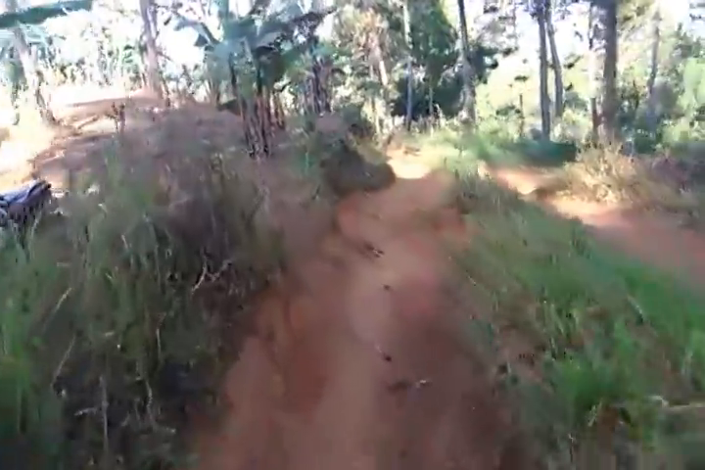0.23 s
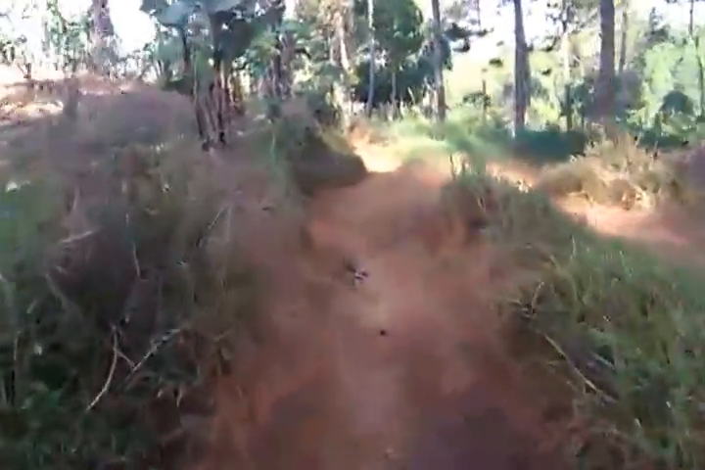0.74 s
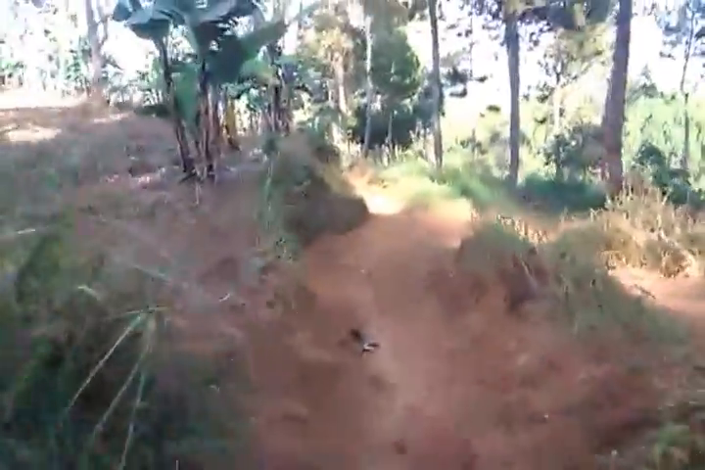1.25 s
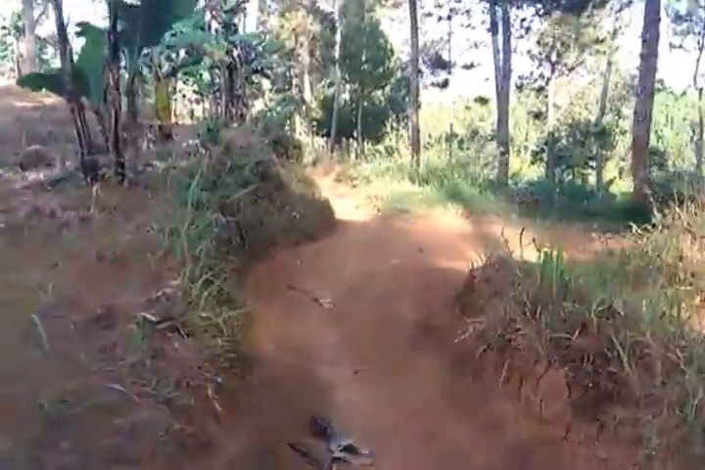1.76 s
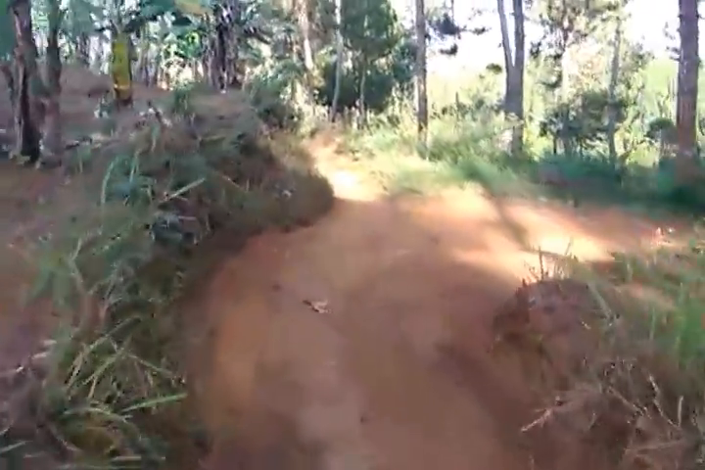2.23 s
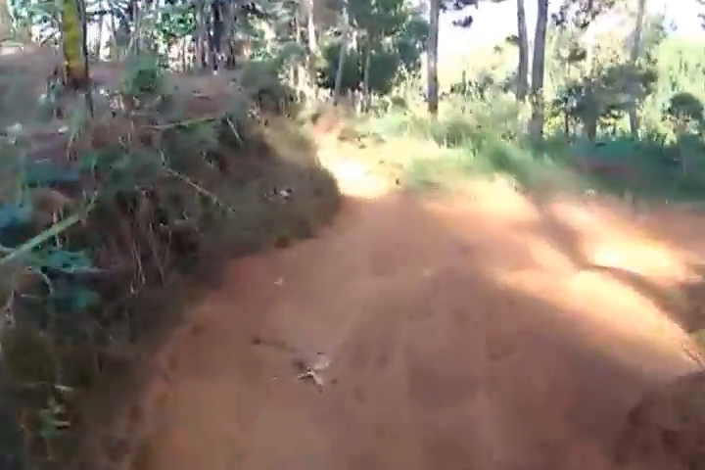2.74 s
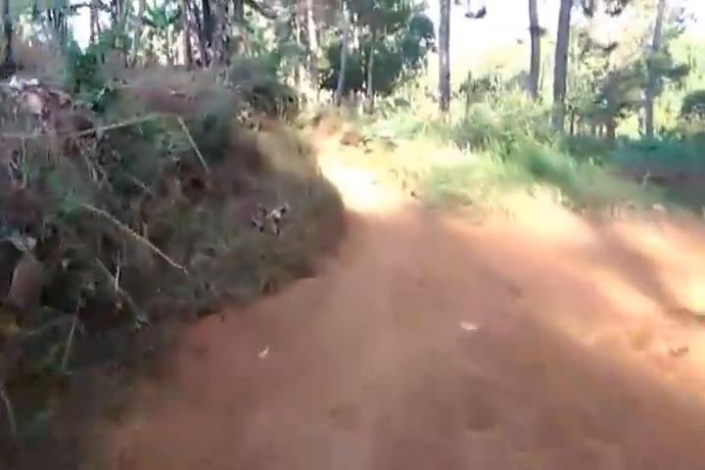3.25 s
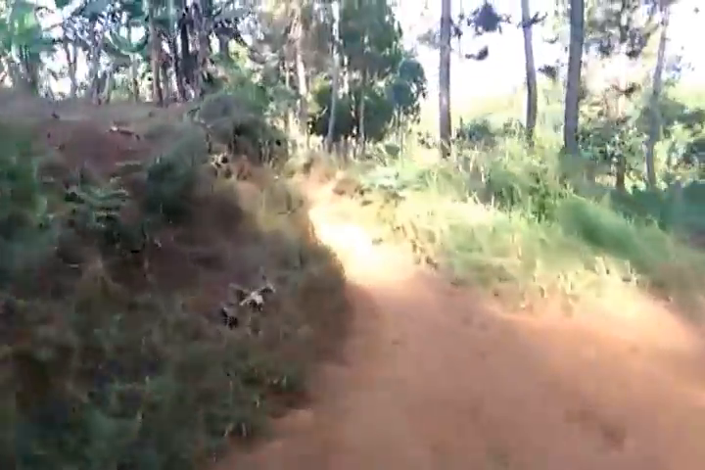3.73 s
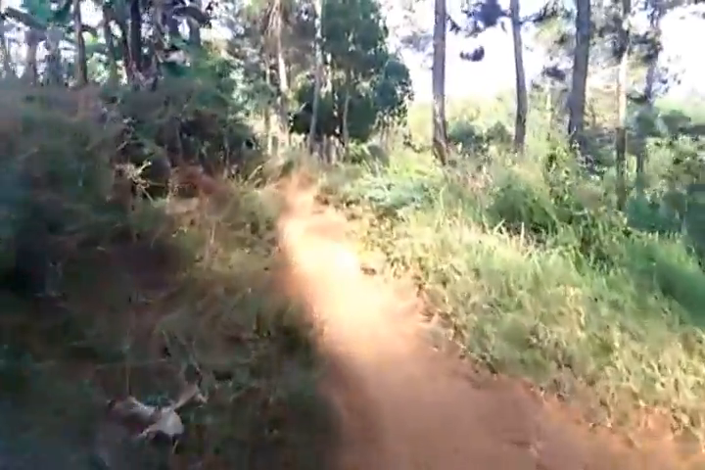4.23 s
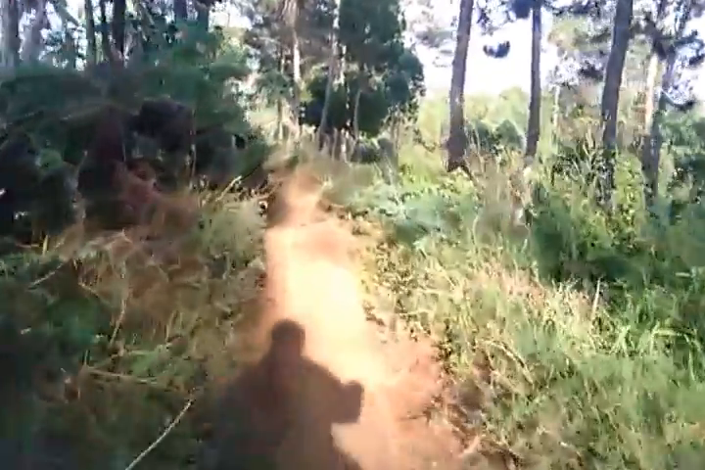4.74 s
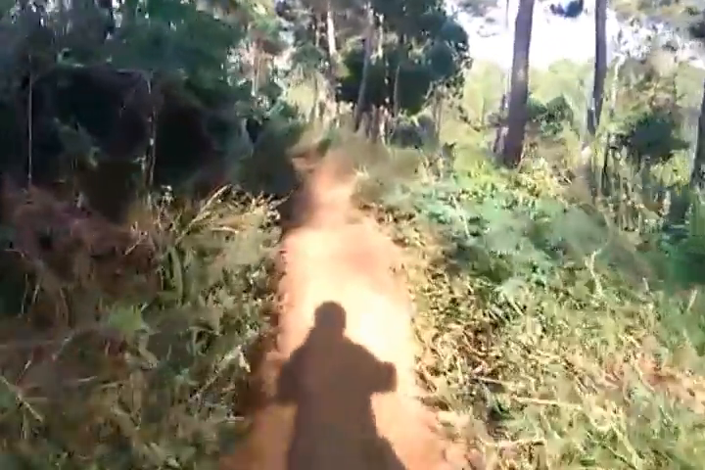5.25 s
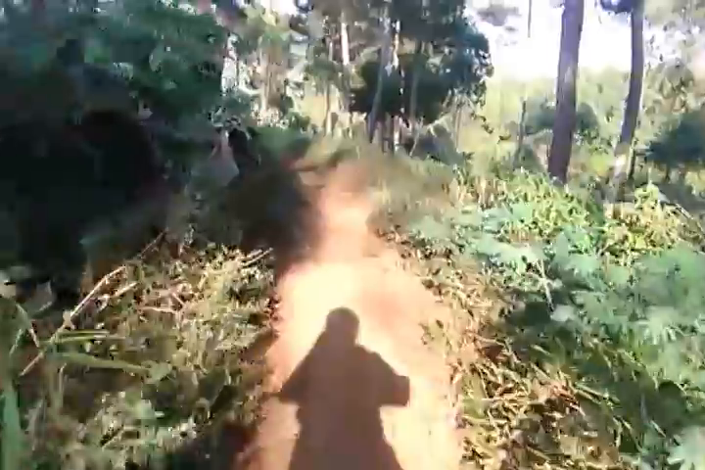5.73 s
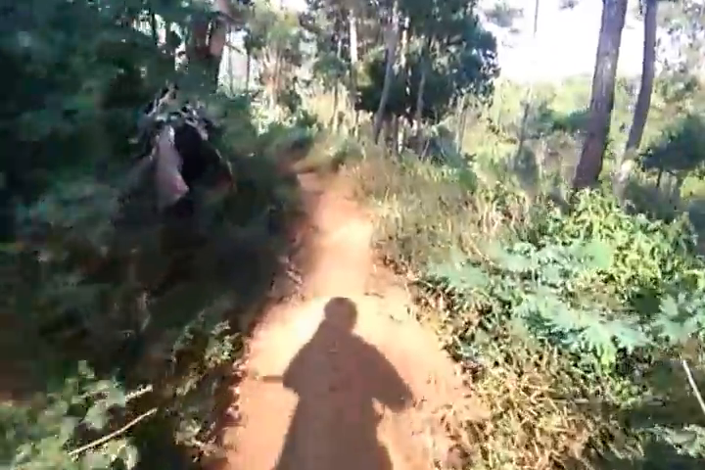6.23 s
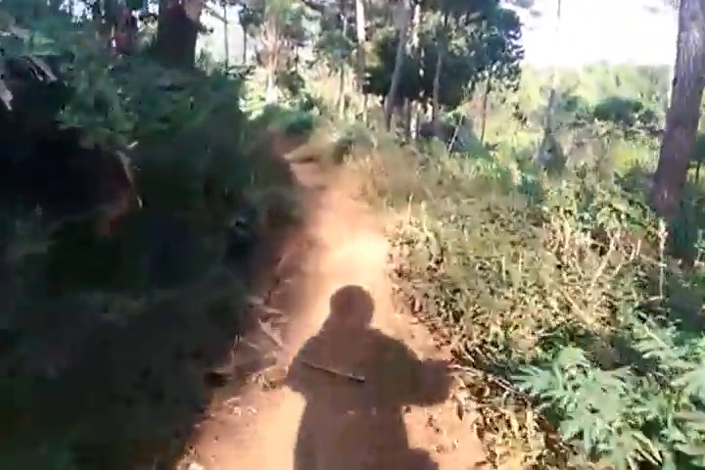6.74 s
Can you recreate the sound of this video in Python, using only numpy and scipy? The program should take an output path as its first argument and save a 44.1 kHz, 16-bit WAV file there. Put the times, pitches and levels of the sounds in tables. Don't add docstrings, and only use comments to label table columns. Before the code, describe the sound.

A four-stroke dirt bike putters slowly along a rough dirt path outdoors, heard very close through a dull on-body microphone with little top end. Uneven exhaust pulses dominate, about twelve a second, with ticking, rattling metal and low mount rumble. Jolts knock the microphone, small stones tick, a brief rev rises midway and falls with a hiccup, then steady lighter idling continues to the end.

```python
import sys
import numpy as np
from scipy import signal
from scipy.fft import rfft, irfft
from scipy.io import wavfile
from scipy.ndimage import uniform_filter1d

SR = 44100
rng = np.random.default_rng(int(sys.argv[2]) if len(sys.argv) > 2 else 0)


def invert_db(level):
    return 10 ** (np.asarray(level, dtype=float) / 20)


def dump_mix(stems):
    frames = np.atleast_2d(stems).T
    limited = np.clip(frames, -1, 1)
    pcm = np.round(limited * 32767).astype(np.int16)
    wavfile.write(sys.argv[1], SR, pcm)


N = 307799
IDLE_PER_S = 12

# time in seconds, firings per second.
ENGINE_SPEED = [(0.0, 12.576), (0.41, 12.752), (0.45, 12.487), (1.41, 11.339), (1.88, 11.769),
                (2.4, 13.051), (2.58, 14.374), (2.69, 14.059), (3.33, 16.961), (3.96, 11.506),
                (4.48, 11.687), (4.82, 12.474), (4.98, 11.988), (5.46, 12.776), (5.7, 12.053),
                (6.44, 11.815), (6.45, 12.03), (6.98, 11.436)]

# time in seconds, boom at the camera in dB, bark trim in dB,
# outlet jet in dB, extra puff length in ms.
THROTTLE_LEAN = [(0, 10.5, -3, 0.5, .2), (.25, 10.5, -0.4, -0.5, 0.66), (.64, 14, -2, -.6, -0.051),
                 (.8, 12.5, -.6, -3, -.1), (1.2, 14, 2.5, -1, 0.11), (1.55, 12.7, 3.5, -2, -0.12),
                 (2.0, 15, 3.5, -3, -.25), (2.4, 12.5, 0.9, 0.7, .6), (2.75, 14.5, 2, -2, 0.083),
                 (3.03, 19.5, 1.1, 1.5, -0.14), (3.4, 16.5, -1, -1.5, 0.099), (3.9, 13.5, 4, -4, 0.38),
                 (4.3, 9, 2, -0.3, 0.082), (4.95, 4, -0.5, 0.3, 0.21), (5.55, 9.5, 0, 0.8, 0.044),
                 (6.1, 7.5, 1.1, 0, 0.48), (6.45, 9, -0.5, 1, .12), (6.9, 11.5, 1.6, -1, -0.12)]

# place after the puff as a share of the cycle, width as a share of
# the cycle, frequency struck most in Hz, reach in octaves, level in dB.
VALVE_KNOCKS = [
    (.21, 0.068, 1950, .35, 4.5),
    (.36, 0.066, 850, 0.29, 6.5),
    (.42, 0.057, 1300, .2, -2),
    (.53, 0.028, 780, 0.4, 5),
    (.8, 0.064, 1220, 0.18, 3.5),
    (0.896, 0.06, 3360, 1, 3.5),
    (.34, 0.035, 4000, 0.38, 7.5),
    (0.27, 0.13, 140, 1, 2.5),
]


def ring(x, hz, width_hz, order=1):
    b, a = signal.iirpeak(hz, hz / width_hz, SR)
    for _ in range(order):
        x = signal.lfilter(b, a, x)
    return x


def unit(x):
    return x / np.sqrt(np.mean(x ** 2))


def add(out, x, s):
    start = int(round(s * SR))
    a, b = max(start, 0), min(start + len(x), N)
    out[a:b] += x[a - start:b - start]


def colour(x, points):
    hz, db = np.transpose(points)
    f = np.arange(1, N // 2 + 2) * SR / N
    gain_db = np.interp(np.log(f), np.log(hz), db, -90, -90)
    return irfft(rfft(x) * invert_db(gain_db), N)


def walk(rate):
    hold = int(SR / rate)
    steps = np.repeat(rng.standard_normal(N // hold + 1), hold)
    return uniform_filter1d(steps, hold)[:N]


def grains(per_s, spread_db):
    hit = rng.random(N) < per_s / SR
    size = invert_db(spread_db * rng.standard_normal(N))
    return unit(hit * size * rng.choice([-1, 1], size=N))


def curve(table, s):
    knots, *columns = np.transpose(table)
    return [np.interp(s, knots, c) for c in columns]


def struck(hz, gear):
    _, _, centre, reach, db = np.transpose(VALVE_KNOCKS)
    octaves = np.log2(hz / centre)
    return invert_db((db * np.exp(-(octaves / reach) ** 2)) @ gear)


def rumble():
    # frequency in Hz, level per Hz in dB.
    mount_spectrum = [(20, -3), (60, 0), (100, -0.5), (150, -7), (210, -11), (340, -6), (420, -16.5),
                      (520, -19.5), (750, -29), (1000, -41)]
    shake = rng.standard_normal(N) * invert_db(3.0 * walk(9)) + 0.49 * grains(60, 1.5)
    return unit(colour(shake, mount_spectrum))


def grit(gear, shake):
    # frequency in Hz, level per Hz in dB.
    grit_spectrum = [(1940, -25.5), (3300, -10), (3670, -5.5), (4100, -9), (4290, -1), (6040, 1),
                     (6640, -5), (7220, -10), (7640, -20), (9930, -50.5), (16800, -120)]
    hiss = rng.standard_normal(N) * invert_db(1.6 * walk(25)) + 0.31 * grains(680, 2.0)
    return unit(colour(hiss * shake * struck(3100, gear), grit_spectrum))


def chatter():
    # start in seconds, length in seconds, peak in dB, frequency in Hz.
    ruts = [
        (0.221, .03, -13.5, 190),
        (.655, .062, -12.5, 228),
        (3.715, .05, -18, 210),
        (3.8086, .058, -11.5, 238),
    ]
    beat_s = .0078
    rows = []
    for (s, length, db, hz), chance in zip(ruts, rng.standard_normal((len(ruts), 12, 3))):
        for k, (late, size, pitch) in enumerate(chance):
            if k * beat_s < length:
                when = s + beat_s * (k + 0.14 * late)
                rows.append((when, db + 1.4 * size, hz * 1.35 ** pitch, (-1) ** (k // 2)))
    return rows


def bumps():
    # time in seconds, peak in dB, frequency in Hz, direction as +1 or -1.
    jolts = [(0.1545, -9, 360, -1), (0.261, -8, 215, -1), (0.4322, -14, 163, -1), (0.628, -13, 204, -1),
             (0.6794, -5.5, 187, 1), (0.871, -19, 185, -1), (1.4347, -15.5, 198, -1), (1.5143, -12, 262, 1),
             (1.5203, -15, 232, 1), (2.636, -16, 150, 1), (2.6472, -13, 167, -1), (3.012, -13, 219, -1),
             (3.47, -20, 198, 1), (3.6533, -10, 215, 1), (3.6736, -11.5, 315, -1), (3.8257, -7.5, 347, -1),
             (3.9704, -20, 261, 1), (3.991, -17, 241, -1), (4.1612, -16, 219, -1), (4.5025, -16.5, 347, -1),
             (4.5857, -20, 193, -1), (4.6573, -17, 180, -1), (4.6861, -14, 204, -1), (4.707, -16, 166, 1),
             (4.934, -15.5, 159, -1), (5.3237, -21, 230, 1), (5.5376, -9, 206, 1), (5.9125, -10.5, 211, -1),
             (6.1118, -17, 206, -1), (6.2566, -14.5, 267, -1)]
    out = np.zeros(N)
    t = np.arange(-600, 600) / SR
    for s, db, hz, way in jolts + chatter():
        swing = np.exp(-(t * hz / 0.62) ** 2) * np.cos(2 * np.pi * hz * t)
        swing = swing + 0.1 * np.exp(-(t / 0.00063) ** 2)
        add(out, np.sign(way) * invert_db(db) * swing, s + t[0])
    return out


def ticks():
    # time in seconds, peak in dB, frequency in Hz.
    stones = [(.9562, -27.5, 4500), (1.3868, -29, 3500), (1.8757, -23.5, 5400), (1.916, -23.5, 4560),
              (2.0174, -19.5, 4410), (2.0713, -23.5, 4000), (2.3895, -29.5, 4050), (2.5445, -22, 6570),
              (2.578, -26.5, 5630), (2.82, -25, 4510), (3.025, -21, 5100), (4.0254, -22, 3000),
              (4.6892, -22, 2500), (5.6134, -29, 4060), (6.0256, -30, 3920), (6.2584, -26.5, 4500),
              (6.573, -24.5, 6300), (6.574, -25.5, 3950), (6.588, -21.5, 1600)]
    # time in seconds, peak in dB, frequency in Hz, decay in ms.
    slaps = [(1.514, -21.5, 550, 5), (2.5446, -24, 5200, 4.5), (2.556, -21.5, 1890, 8),
             (2.5565, -26.5, 3030, 6), (2.559, -20, 636, 17), (2.703, -25.5, 684, 11),
             (3.826, -21, 700, 12), (3.828, -27, 1940, 19), (4.06, -28, 1980, 11), (5.77, -21.5, 734, 9.3),
             (.7, -27, 520, 14)]
    stone_width_hz, stone_decay_ms, slap_width_hz = 2600, 2.8, 370
    out = np.zeros(N)
    ms = np.arange(3000) / SR * 1000
    hits = [(s, db, hz, min(stone_width_hz, hz), stone_decay_ms) for s, db, hz in stones]
    hits += [(s, db, hz, slap_width_hz, decay_ms) for s, db, hz, decay_ms in slaps]
    noises = rng.standard_normal((len(hits), len(ms)))
    for (s, db, hz, width_hz, decay_ms), noise in zip(hits, noises):
        blow = (1 - np.exp(-ms / 1.7)) * np.exp(-ms / decay_ms)
        add(out, invert_db(db) * blow * unit(ring(noise, hz, width_hz, order=2)), s)
    return out


def valve_gear(fired_s):
    turn = np.interp(np.arange(N) / SR, fired_s, np.arange(len(fired_s)))
    cycle, phase = turn.astype(int), turn % 1
    force = 2 * rng.random((len(fired_s), len(VALVE_KNOCKS)))[cycle].T
    knocks = [np.exp(-((phase - share) / width) ** 2) for share, width, *_ in VALVE_KNOCKS]
    return force * np.array(knocks)


def clatter(modes, gear, shake, dull_db, flicker_db):
    knocks = shake * (rng.standard_normal(N) + 0.53 * grains(400, 3.2))
    rung = np.zeros(N)
    for hz, width_hz, db in modes:
        flicker = invert_db(db + flicker_db * walk(26))
        rung += flicker * ring(knocks * struck(hz, gear), hz, width_hz)
    low, high = modes[0][0], modes[-1][0]
    dull = ring(knocks, np.sqrt(low * high), 0.48 * (high - low), order=2)
    return unit(rung + invert_db(dull_db) * dull)


def firings():
    # time in seconds, boom change in dB, bark change in dB,
    # jet change in dB, boom change in Hz.
    misfires = [
        (3.15, -2.5, -3.5, -4, 1.5),
        (3.45, -4, -40, -23, -10),
        (3.518, 0.8, 2.5, 0.5, 0.5),
        (3.654, -1.5, -4.5, -1.2, 3),
        (3.725, -4.5, -2.5, -10, 3.5),
        (3.804, -2.5, -3.5, 0, 8),
        (3.971, -5.5, -7, -6, 6),
        (4.139, -10.5, -6.5, -8, 1),
        (6.204, 5, -0.5, 0.5, 2.5),
    ]
    t = np.arange(N) / SR
    rate = curve(ENGINE_SPEED, t)[0]
    turn = -.005 + np.cumsum(rate) / SR
    s = np.interp(np.arange(int(turn[-1]) + 1), turn, t)
    extra = curve(ENGINE_SPEED, s)[0] - IDLE_PER_S
    chance = rng.standard_normal((len(s), 4)).T
    boom_db, trim_db, jet_db, longer_ms = curve(THROTTLE_LEAN, s)
    longer_ms = longer_ms + .12 * chance[0]
    bark_db = trim_db + 16 + 4 * extra + 7.5 * longer_ms
    levels = np.array([boom_db, bark_db, jet_db]) + 0.76 * chance[1:]
    boom_hz = 74.4 + 2.05 * extra + .5 * chance[0]
    puff_ms = 4.33 + .13 * extra + longer_ms
    for when, *change_db, shift_hz in misfires:
        k = np.argmin(np.abs(s - when))
        levels[:, k] += change_db
        boom_hz[k] += shift_hz
    return np.array([s, *levels, boom_hz, puff_ms]).T


def rasp(fired):
    flow = np.zeros(N)
    ms = np.arange(4000) / SR * 1000
    for s, boom_db, *_ in fired:
        gush = (1 - np.exp(-ms / 6)) * np.exp(-ms / 18)
        add(flow, invert_db(0.8 * (boom_db - 4.5)) * gush, s)
    gas = rng.standard_normal((2, N))
    broad = invert_db(-40.5) * unit(ring(gas[0], 450, 170, order=2))
    narrow = invert_db(-35) * unit(ring(gas[1], 349, 70, order=2))
    return flow * (broad + narrow)


def exhaust(fired):
    # frequency in Hz, width in Hz.
    pipe_sections = [(283, 84), (303, 185), (356, 41), (487, 600)]
    can_lag_ms, cool_hz, lead_ms = 4.45, 77, 5
    out = np.zeros(N)
    ms = np.arange(int(.14 * SR)) / SR * 1000 - lead_ms
    for s, boom_db, bark_db, jet_db, boom_hz, puff_ms in fired:
        puff = np.sin(np.pi * np.clip(ms / puff_ms + .5, 0, 1)) ** 2
        late = np.sin(np.pi * np.clip((ms - can_lag_ms) / puff_ms + .5, 0, 1)) ** 2
        heat = boom_hz / cool_hz - 1
        boom = ring(late, boom_hz, 19 - 45 * heat)
        boom = ring(boom, 1.89 * boom_hz, 142)
        bark = puff
        for hz, width_hz in pipe_sections:
            bark = ring(bark, hz * (1 + .81 * heat), width_hz)
        jet = ring(puff, 167, 85)
        blast = invert_db(boom_db - 1.06) * boom + invert_db(bark_db - 0.12) * bark - invert_db(jet_db) * jet
        add(out, blast, s - lead_ms / 1000)
    return out


def scene():
    # time in seconds, shake in dB.
    ground = [(0, -2.5), (.3, 0), (1.0, -1), (1.45, 1), (1.95, 2.5), (2.25, -1.5), (2.55, 0.5), (3.75, 3.5),
              (4.0, 4.5), (4.3, 1.2), (4.55, 2), (4.8, -1.5), (5.3, -1), (6.0, 1.2), (6.4, 0), (6.75, 1.6),
              (6.98, -1.8)]
    # level at idle in dB, share of the shake, dB per extra firing per second,
    # share of the lean.
    layers = [
        (-28, .3, 0.5, .02),
        (-35, 0.48, 0.21, -.12),
        (-40.5, 1, 0.2, -.05),
        (-44, .9, 0.6, .05),
    ]
    # frequency in Hz, width in Hz, level in dB.
    case_modes = [(697, 53, -7.5), (835, 25, -1.5), (886.4, 66, 0), (1120, 84, 0.5), (1213.6, 35, 1.5),
                  (1397, 47, -8.5)]
    # frequency in Hz, width in Hz, level in dB.
    fin_modes = [(1755, 45, 1.5), (1903, 36, 5.5), (2042, 160, 2.5), (2240, 220, -10.5), (2500, 56, -4),
                 (2690, 56, -5), (2853, 23, -3), (3000, 150, -19.5), (3830, 35, -6)]
    t = np.arange(N) / SR
    rough_db = curve(ground, t)[0]
    extra = curve(ENGINE_SPEED, t)[0] - IDLE_PER_S
    lean_db = curve(THROTTLE_LEAN, t)[0] - 11
    rumble_db, cases_db, fins_db, grit_db = (
        db + share * rough_db + rev_db * extra + lean * lean_db for db, share, rev_db, lean in layers)
    fired = firings()
    gear = valve_gear(fired[:, 0])
    shake = invert_db(1.2 * walk(18))
    trail = invert_db(rumble_db) * struck(160, gear) * rumble()
    trail = trail + invert_db(grit_db) * grit(gear, shake) + bumps() + ticks()
    engine = invert_db(cases_db) * clatter(case_modes, gear, np.sqrt(shake), dull_db=-5.5, flicker_db=2.4)
    engine = engine + invert_db(fins_db) * clatter(fin_modes, gear, shake, dull_db=-13.5, flicker_db=2.5)
    return (trail + engine + rasp(fired) + exhaust(fired))[None]


def top_cut(x):
    return signal.sosfilt(signal.butter(12, 7790, fs=SR, output="sos"), x)


def record(dry):
    full = dry + .002
    full = full / (1 + np.abs(full / .99) ** 16) ** (1 / 16)
    low_pass = signal.butter(12, 7290, fs=SR, output="sos")
    cut = signal.sosfiltfilt(low_pass, full)
    return top_cut(cut)


dry = scene()
out = record(dry)
dump_mix(out)
```